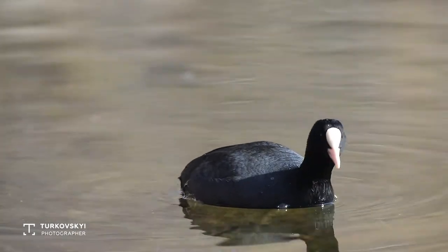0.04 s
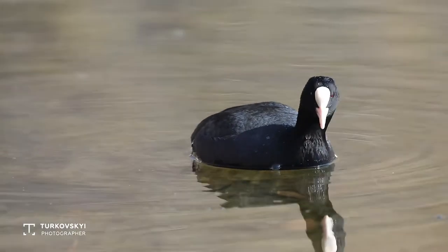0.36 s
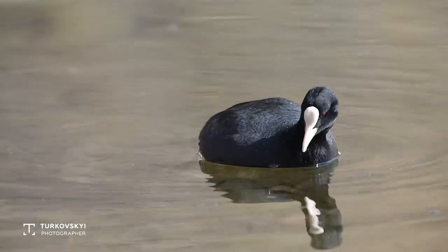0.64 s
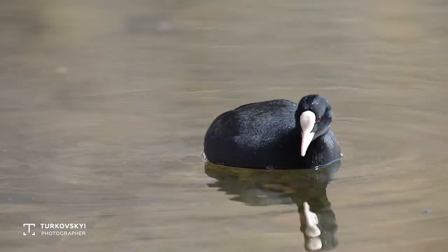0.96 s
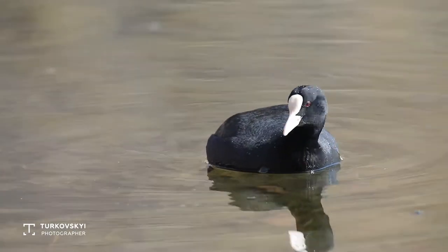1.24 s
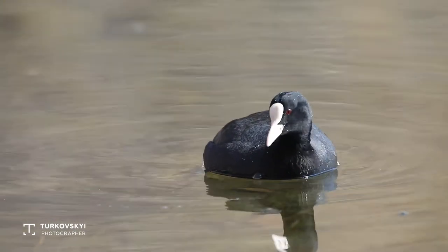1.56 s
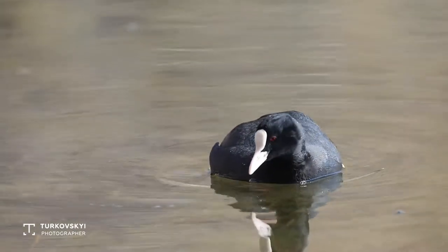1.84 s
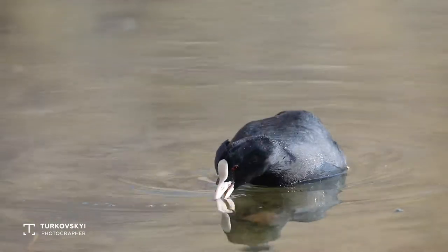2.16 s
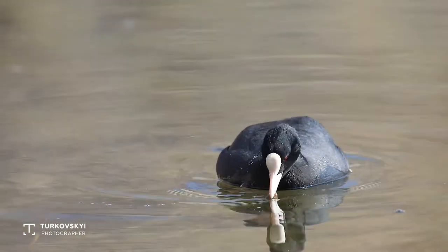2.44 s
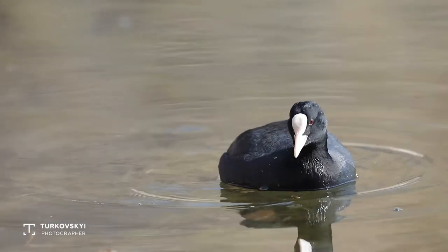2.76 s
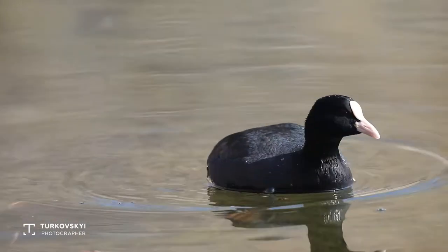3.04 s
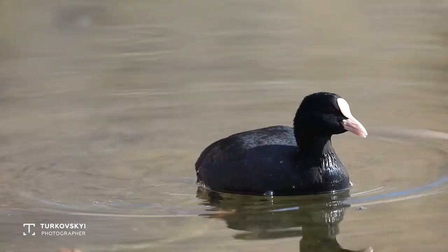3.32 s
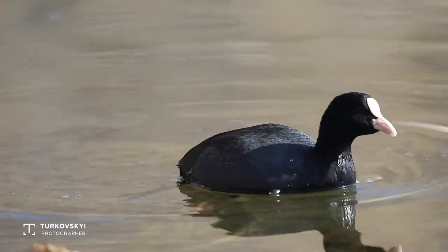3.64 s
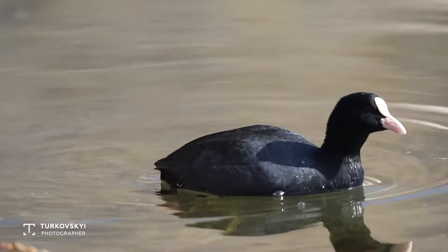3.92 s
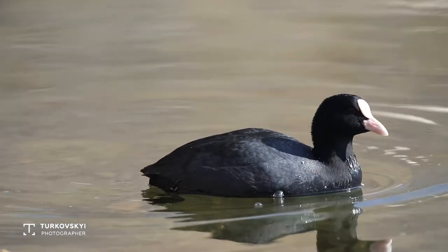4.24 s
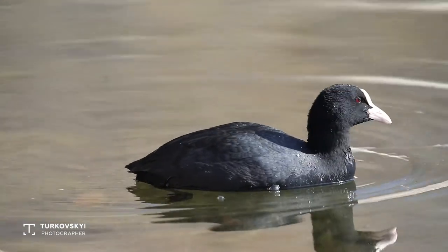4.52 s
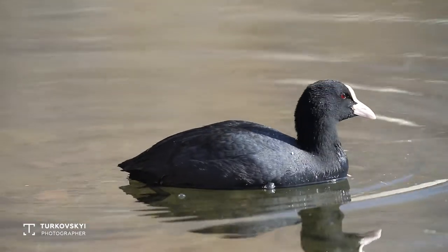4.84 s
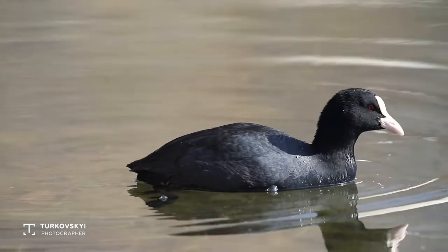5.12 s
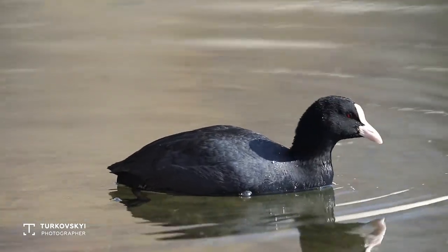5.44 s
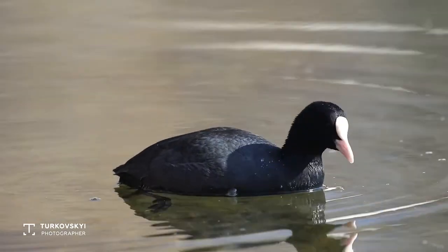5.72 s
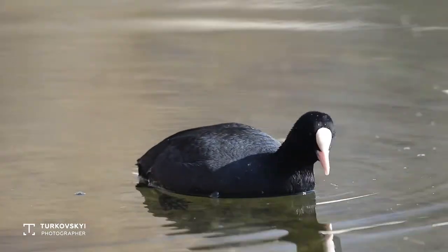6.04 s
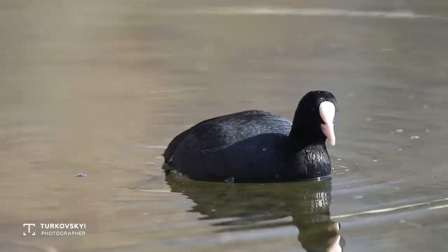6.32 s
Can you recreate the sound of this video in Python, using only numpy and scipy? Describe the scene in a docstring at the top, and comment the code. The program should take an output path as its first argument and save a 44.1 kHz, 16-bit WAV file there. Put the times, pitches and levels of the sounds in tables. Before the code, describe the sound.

A coot gives three sharp, close calls on a calm pond while small birds whistle and chirp over a low outdoor rumble.

```python
"""Small birds whistle far off over a low outdoor rumble, heard from the edge of a calm pond.
Close by, a coot gives three sharp "pik" calls, each a rattle of short syrinx bursts that sinks
into a hoarse end. Songbird chips, a far waterbird's yelps, a finch's song and four hard chups
come in around it, and the wooded banks answer with a soft echo.
One microphone hears it all, nearly mono."""
import sys
import numpy as np
from scipy import signal
from scipy.fft import rfft, irfft, next_fast_len
from scipy.io import wavfile
from scipy.ndimage import map_coordinates

SR = 44100
rng = np.random.default_rng(int(sys.argv[2]) if len(sys.argv) > 2 else 0)


def wrap_up_sound(samples):
    """Save the sound to the file named by the first command line argument, as 16-bit audio."""
    columns = np.atleast_2d(samples).T
    # keep every value between -1 and 1, then stretch to whole-number steps
    tamed = np.clip(columns, -1, 1)
    steps = np.round(tamed * 32767).astype(np.int16)
    wavfile.write(sys.argv[1], SR, steps)


N = 285768


def amp(db):
    """Decibels to gain."""
    return 10 ** (np.asarray(db) / 20)


def along(points, hz):
    """Read (Hz, value) points on a log frequency axis."""
    point_hz, values = np.transpose(points)
    return np.interp(np.log(hz + 1), np.log(point_hz), values)


def wobble(rate, size):
    """A smooth random curve with rate knots a second."""
    return map_coordinates(rng.standard_normal(size // 16 + 4), [np.arange(size) * rate / SR])


def filtered(x, gain):
    """x times a gain that depends on frequency."""
    size = x.shape[-1]
    padded = next_fast_len(size + 8192)
    return irfft(rfft(x, padded) * gain(np.fft.rfftfreq(padded, 1 / SR)), padded)[..., :size]


def resonate(x, gain):
    """Causal filter with the given gain curve: its peaks ring on."""
    padded = 4 * len(x)
    cepstrum = irfft(np.log(gain(np.fft.rfftfreq(padded, 1 / SR)) + 1e-6), padded)
    fold = 1 + np.sign(padded / 2 - np.arange(padded))  # gives minimum phase
    fold[0] = 1
    return irfft(rfft(x, padded) * np.exp(rfft(cepstrum * fold)), padded)[:len(x)]


def noise(gain, size):
    """Coloured noise of rms 1."""
    x = filtered(rng.standard_normal(size), gain)
    return x / np.sqrt(np.mean(x ** 2) + 1e-20)


def add(track, start_s, sound):
    """Mix a sound into the track from start_s on."""
    start = max(round(start_s * SR), 0)
    part = track[start:start + len(sound)]
    part += sound[:len(part)]


def air(rumble_db=-.5, hiss_db=-55.5, split_hz=500, drone_hz=62, drone_width_hz=5, drone_db=-7):
    """Distant rumble with a low drone in it, under a faint even hiss."""
    # colour of the open air: frequency_hz, relative_db
    spectrum = [(12, -41), (20, -22), (55, 1), (176, 3), (354, -5.5), (467, -11), (730, -15.5), (1140, -15),
                (2290, -24), (4120, -25), (4600, -23.5), (5590, -30.5), (12600, -39.5), (14400, -39.5),
                (15700, -39)]
    # slow drift of rumble and drone together: time_s, gain_db
    drift = [(0.0, -54), (1.23, -52.5), (5.0, -54), (6.17, -50.5), (6.48, -52)]
    level = amp(np.interp(np.arange(N) / SR, *np.transpose(drift)))
    low_share = lambda f: 1 / (1 + (f / split_hz) ** 4)
    rumble = amp(rumble_db) * noise(lambda f: amp(along(spectrum, f)) * np.sqrt(low_share(f)), N)
    hiss = amp(hiss_db) * noise(lambda f: amp(along(spectrum, f)) * np.sqrt(1 - low_share(f)), N)
    drone = amp(drone_db) * noise(lambda f: 1 / (1 + ((f - drone_hz) / drone_width_hz) ** 2), N)
    return level * (rumble + drone) + hiss


def note(length_s, start_hz, middle_hz, end_hz, db, trill=0, trill_hz=110, waver=.0075, flutter_db=3):
    """A whistled glide through three pitches, with an optional fast trill."""
    t = np.arange(int(length_s * SR) + 2) / SR
    progress = np.clip(t / length_s, 0, 1)
    glide = np.polyval(np.polyfit([0, .5, 1], [start_hz, middle_hz, end_hz], 2), progress)
    pitch = glide * (1 + trill * np.sin(2 * np.pi * trill_hz * t) + waver * wobble(160, len(t)))
    swell = np.sqrt(np.abs(np.sin(np.pi * progress))) * amp(flutter_db * wobble(83.5, len(t)))
    return amp(db) * swell * np.sin(2 * np.pi * np.cumsum(pitch) / SR)


def far_whistles(trim_db=-4):
    """Small birds send thin, evenly gliding whistles from the trees."""
    # the clearest whistles: start_s, length_s, start_hz, end_hz, relative_db, trill_share_of_pitch
    whistles = [ (0, 0.098, 8190, 8030, -59, .018), (0, 0.09, 3470, 3340, -48.5, 0.03),
                (0, 0.12, 2890, 2844, -51.5, 0.026), (0.08, 0.083, 3950, 3710, -41, 0.025),
                (0.232, 0.12, 5050, 4260, -40, 0.043), (0.283, 0.089, 3284, 3240, -42.5, .005),
                (0.679, .13, 3634, 3544, -45, 0.025), (0.813, .16, 2748, 2645, -51.5, 0.022),
                (0.88, 0.051, 3246, 3310, -43.5, 0.043), (0.962, 0.064, 9920, 10100, -60, 0.019),
                (.964, 0.052, 4010, 3930, -48, .02), (0.981, .17, 1996, 2444, -50.5, 0.034),
                (1.029, 0.099, 8700, 7500, -60.5, 0.084), (1.607, 0.11, 1940, 1880, -59.5, 0.053),
                (1.78, 0.044, 3990, 3890, -53, 0.0088), (1.9, 0.23, 1810, 1782, -59, 0.014),
                (1.914, .14, 9150, 10060, -66, 0.025), (2.359, 0.12, 6930, 6930, -47, .02),
                (2.559, 0.12, 6730, 6520, -49, .012), (3.404, 0.098, 8260, 8150, -58.5, 0.018),
                (4.583, 0.14, 7090, 6710, -51, 0.016), (4.775, 0.13, 6500, 6330, -55, 0.005),
                (4.983, .21, 1945, 1852, -61, 0.0032), (6.136, 0.33, 2760, 2710, -53, 0.012)]
    track = np.zeros(N)
    for start_s, length_s, start_hz, end_hz, db, trill in whistles:
        middle_hz = (start_hz + end_hz) / 2
        add(track, start_s, note(length_s, start_hz, middle_hz, end_hz, db + trim_db, trill))
    return track


def chorus(count=90, centre_hz=3500, typical_s=.04, level_db=-64):
    """Stray twitters from deep in the wood, barely above the hiss."""
    track = np.zeros(N)
    for when, (stretch, height, bend) in zip(rng.random(count), rng.standard_normal((count, 3))):
        length_s = typical_s * np.exp(.3 * stretch)
        hz, glide = centre_hz * np.exp(.3 * height), np.exp(.12 * bend)
        add(track, when * N / SR, note(length_s, hz * glide, hz, hz / glide, level_db, trill=.018))
    return track


def effort(t, hold_s, opening=.56, attack_s=.009, release_s=.00886):
    """The coot's push of air t seconds into a call, 0 to 1: attack, hold, release."""
    attack = min(opening + (1 - opening) * t / attack_s, 1)
    return attack * np.exp(-max(t - hold_s, 0) / release_s)


def syrinx_burst(length_s, hz, odd_db, high_odd_db, bright_db, rough):
    """One puff through the coot's syrinx, centred in 40 ms: the pitch arches with the pressure."""
    # resonances of the throat and open bill: frequency_hz, gain_db
    throat = [(520, -26), (860, -2.5), (1300, -11.5), (1700, 2), (2020, 3), (2280, -4), (2600, -0.5),
              (3350, -1), (4050, 5), (4550, -8), (5350, -12.5), (6000, -9.5), (8700, -15), (13000, -49.5)]
    size = SR // 25
    t = (np.arange(size) - size / 2) / SR
    half_s = length_s / 2
    skewed_time = t / half_s * (1 - .22 * np.sign(t))  # quick rise, slower fall
    swell = np.exp(-1.45 * skewed_time ** 2)
    # the membrane stirs just before the puff, and sings on softly after it as its pitch slides down
    stir = amp(-22) * np.exp(-((t + half_s + .001) / .001) ** 2)
    linger = amp(-17) * np.exp(-((t - half_s - .0018) / .002) ** 2)
    sag = .24 * (1 - np.exp(-(t / (half_s + .0018)) ** 4))
    pitch = hz * (1 - sag) * (1 + .026 * rough * wobble(1045, size))
    phase = 2 * np.pi * np.cumsum(pitch) / SR
    tone = np.zeros(size)
    for k in range(1, 14):
        weight_db = (odd_db if k < 5 else high_odd_db) * (k % 2)
        envelope = swell + (stir + linger) * (k in (2, 4))
        scatter = .7 * rng.standard_normal() + .45 * rough * wobble(600, size)
        flutter_db = 7.5 * rough * wobble(516.4, size)
        tone += amp(weight_db + flutter_db) * envelope * np.sin(k * phase + scatter)
    # turbulence roughens mainly the upper partials, most as the puff opens
    rasp = amp(2) * rough * noise(lambda f: f / (f + 3000), size) * np.exp(-(skewed_time + .31) ** 2)
    treble_db = lambda f: bright_db * np.clip((f - 2600) / 1100, 0, 1)
    return resonate(tone + rasp, lambda f: amp(along(throat, f) + treble_db(f)))


def coot(break_effort=.76, break_width=.15, drag_s=.0005, slack_db=-8, clear_db=2.5,
         fade_from_s=.054, fade_db_per_s=260, dulling_db_per_s=201):
    """Close on the water, slowing rattles of bursts; effort sets their pitch, level and hoarseness."""
    # the calls: start_s, burst_count, spacing_s, top_pitch_hz, base_level_db, full_effort_until_s,
    # clear_odd_harmonics_db, hoarse_odd_harmonics_db, base_brightness_db
    calls = [ (.341, 7, 0.01, 1027, -18, .017, -22, 3.5, -0.5),
             (2.3988, 8, 0.0099, 1017, -19, .0205, -19, 3.5, 3),
             (5.155, 7, .0107, 996.5, -19.5, .0205, -7, 4.5, 1)]
    track = np.zeros(N)
    for start_s, count, gap_s, top_hz, db, hold_s, clear_odd_db, hoarse_odd_db, bright_db in calls:
        for k in range(round(count)):
            t = k * gap_s + drag_s * max(k - 3, 0) ** 2  # three even gaps, then the rattle drags
            push = effort(t, hold_s)
            # at full force the odd harmonics fade and the voice breaks into its clear octave
            clear = np.clip((push - break_effort) / break_width, 0, 1)
            hoarseness = .41 + .6 * push  # grows with strain below the break
            fade_db = fade_db_per_s * max(t - fade_from_s, 0)
            level = amp(db + slack_db * (1 - push) + clear_db * clear - fade_db)
            burst = syrinx_burst(length_s=.00441 + .1 * t,
                                 hz=top_hz * (.83 + .17 * push),
                                 odd_db=clear * clear_odd_db + (1 - clear) * hoarse_odd_db,
                                 high_odd_db=-clear,
                                 bright_db=bright_db + 5 - dulling_db_per_s * t,
                                 rough=clear * .27 + (1 - clear) * hoarseness)
            add(track, start_s + t - len(burst) / SR / 2, level * burst)
    return track


def chips_and_chups(flick_db=-6.5, arch_delay_s=.023, arch_fade_db=-8.5,
                    chup_db=-1.5, flick_gap_s=.0148, scratch=.05):
    """Nearer birdsong: scratchy chips of a flick and an arch, then chups of four downward flicks."""
    # two-part chips, then hard chups: start_s, base_level_db
    chips = [(1.179, -44), (1.718, -47.5), (2.287, -39.5)]
    chups = [(5.57, -43.5), (5.862, -44), (6.133, -44.5), (6.389, -43.5)]
    # the glides they are made of: length_s, start_hz, middle_hz, end_hz
    chip_flick = (0.019, 4300, 2800, 2180)
    chip_arch = (0.025, 2650, 3100, 2180)
    chup_flick = (.011, 3470, 2620, 2140)
    # stress on each flick of a chup: gain_db
    stresses = [-5.5, -0.5, 2.5, -11]
    track = np.zeros(N)
    for start_s, db in chips:
        add(track, start_s, note(*chip_flick, db + flick_db, waver=scratch))
        arch = note(*chip_arch, db, waver=scratch)
        fade = amp(arch_fade_db * np.linspace(-.5, .5, len(arch)))
        add(track, start_s + arch_delay_s, arch * fade)
    for start_s, db in chups:
        for k, stress_db in enumerate(stresses):
            flick = note(*chup_flick, db + chup_db + stress_db, waver=scratch)
            add(track, start_s + k * flick_gap_s, flick)
    return track


def far_waterbird(growl_hz=530, rasp_db=-6):
    """A short nasal note holds its pitch, then drops away; a hoarse one carries sidebands and rasp."""
    # the yelps: start_s, length_s, pitch_hz, fall_share_of_pitch, level_db, hoarseness_0_to_1
    yelps = [(1.476, 0.046, 1690, 0.069, -42, 0.13), (2.021, 0.05, 1815, 0.28, -42.5, 0.05),
             (4.504, 0.091, 1625, 0.094, -46.5, 0.73)]
    # the nasal timbre: harmonic_number, gain_db
    partials = [(1, -14), (2, 0), (3, -16.5)]
    track = np.zeros(N)
    for start_s, length_s, hz, fall, db, hoarse in yelps:
        t = np.arange(int(length_s * SR)) / SR
        progress = t / length_s
        pitch = hz * (1 - fall * progress ** 5 + .005 * wobble(300, len(t)))
        phase = 2 * np.pi * np.cumsum(pitch) / SR
        tone = sum(amp(gain_db) * np.sin(k * phase) for k, gain_db in partials)
        growl = 1 + hoarse * np.sin(2 * np.pi * growl_hz * t + .94 * wobble(200, len(t)))
        rasp = hoarse * amp(rasp_db) * noise(lambda f: np.exp(-((f - 3900) / 600) ** 2), len(t))
        swell = np.sin(np.pi * progress ** .6)
        add(track, start_s, amp(db) * swell * (tone * growl + rasp))
    return track


def finch(first_note_db=-5.5, tilt_db_per_octave=30, echo_s=.056, echo_db=-10):
    """Runs of gliding notes, each louder towards its low end; a line of trees repeats them."""
    # runs of like notes: start_s, note_count, spacing_s, length_s, start_hz, end_hz, base_level_db
    runs = [ (2.72, 3, .194, 0.05, 5280, 3686, -45.5), (3.268, 7, .0547, .028, 4200, 2764, -48),
            (3.669, 3, 0.15, 0.021, 4020, 3680, -49), (3.693, 3, .146, 0.025, 2620, 3300, -53.5),
            (3.716, 2, .143, 0.017, 3060, 2595, -45.5), (4.159, 1, 0, .046, 2504, 3640, -50.5)]
    track = np.zeros(N)
    for start_s, count, gap_s, length_s, start_hz, end_hz, db in runs:
        middle_hz = end_hz + .249 * (start_hz - end_hz)  # most of the glide comes early
        rise_db = tilt_db_per_octave * np.log2(start_hz / end_hz)
        for k in range(round(count)):
            sound = note(length_s, start_hz, middle_hz, end_hz, db + first_note_db * (k == 0), waver=.012)
            sound *= amp(rise_db * np.linspace(-.7, .3, len(sound)))
            add(track, start_s + k * gap_s, sound)
            add(track, start_s + k * gap_s + echo_s, amp(echo_db) * sound)
    return track


def banks(x, reeds_db=15, reeds_t60_s=.073, echo_s=.1034, echo_width_s=.013, echo_db=2):
    """Reeds scatter at once, the far bank answers a moment later, and the trees let it die away."""
    # decay among the trees: frequency_hz, t60_s
    decay = [(800, 1.4), (2000, 1.24), (4000, 0.84), (8000, 0.5), (14000, 0.1)]
    # colour of the echo: frequency_hz, gain_db
    colour = [(800, 4), (2000, 6), (2900, 2.5), (4000, 1), (5200, 1), (8000, 2.5), (14000, 11)]
    hz, t, scatter = signal.stft(rng.standard_normal(SR), SR, nperseg=256)
    reeds = amp(reeds_db - 60 * t / reeds_t60_s)
    far_bank = 1 + amp(echo_db) * np.exp(-((t - echo_s) / echo_width_s) ** 2)
    trees = amp(-60 * t / along(decay, hz)[:, None])
    tail = signal.istft(scatter * (trees * far_bank + reeds) * (t > 0), SR, nperseg=256)[1]
    tail = filtered(tail / np.linalg.norm(tail), lambda f: amp(along(colour, f)))
    return signal.fftconvolve(x, tail)[:N]


def scene(water_wet_db=-12, whistle_wet_db=1, song_wet_db=-3, chip_wet_db=-7,
          echo_side_db=-30, air_side_db=-37, self_noise_db=-87):
    """The near coot is fairly dry, the birds in the trees are wetter; the two channels barely differ."""
    piks, yelps = coot(), far_waterbird()
    whistles, song, chips = far_whistles(), finch(), chips_and_chups()
    from_water = amp(water_wet_db) * (piks + yelps)
    from_trees = amp(whistle_wet_db) * whistles + amp(song_wet_db) * song + amp(chip_wet_db) * chips
    from_trees += chorus()  # reaches the microphone only as echo
    direct = piks + yelps + whistles + song + chips
    mid = direct + banks(from_water) + banks(from_trees) + air()
    side = amp(echo_side_db) * banks(piks + whistles) + amp(air_side_db) * air()
    side += amp(self_noise_db) * rng.standard_normal(N)
    return np.array([mid + side, mid - side])


def record(dry, top_hz=15750):
    """The recorder keeps nothing above its band limit."""
    return filtered(dry, lambda hz: hz < top_hz)


dry = scene()
out = record(dry)
wrap_up_sound(out)
```